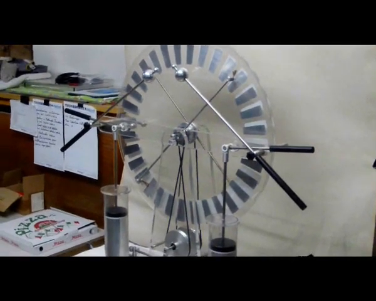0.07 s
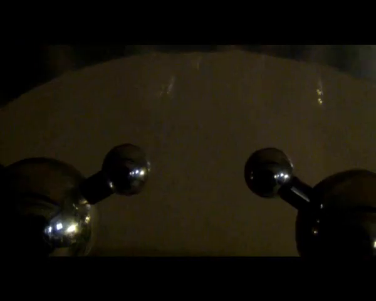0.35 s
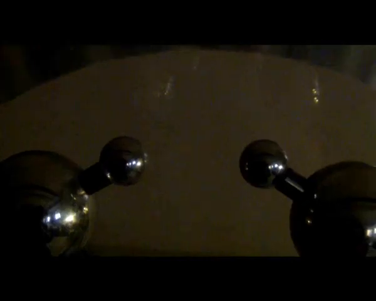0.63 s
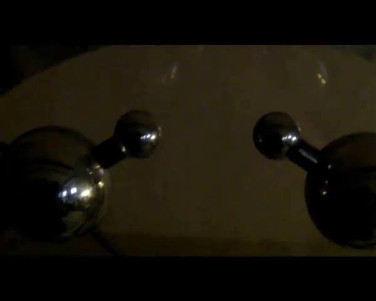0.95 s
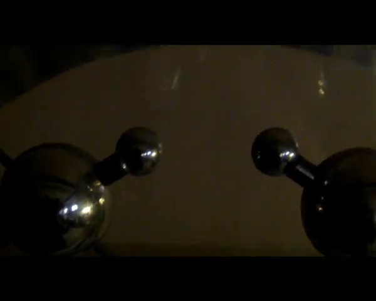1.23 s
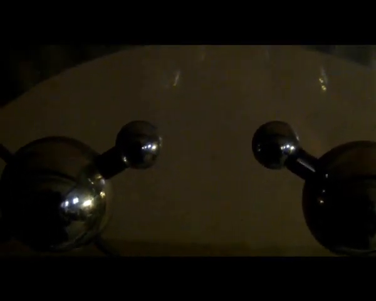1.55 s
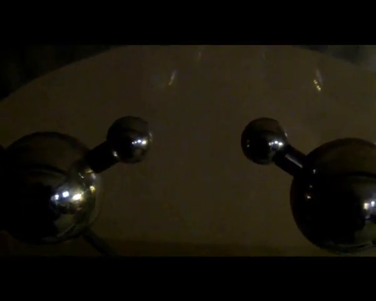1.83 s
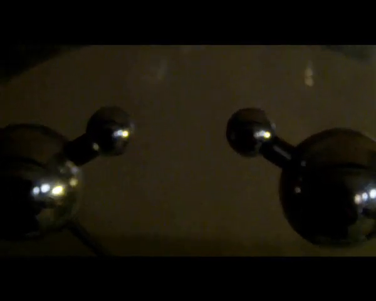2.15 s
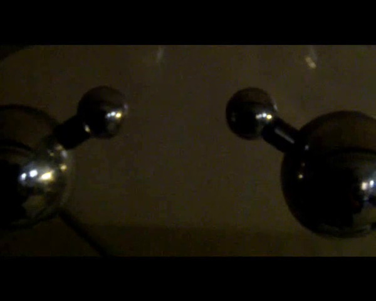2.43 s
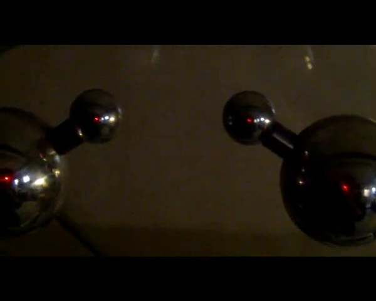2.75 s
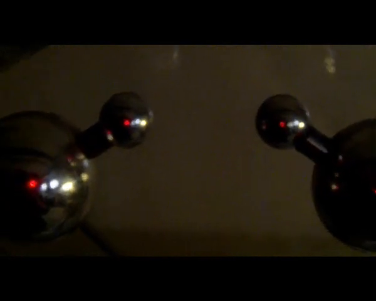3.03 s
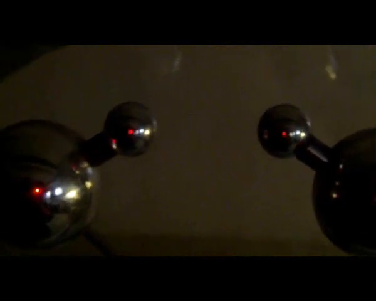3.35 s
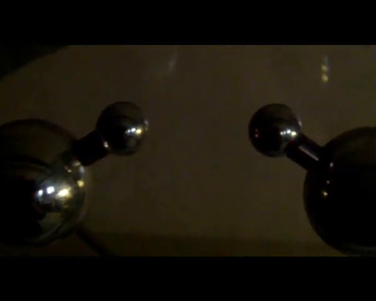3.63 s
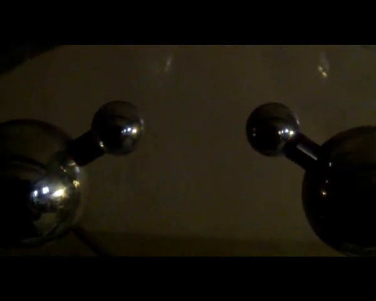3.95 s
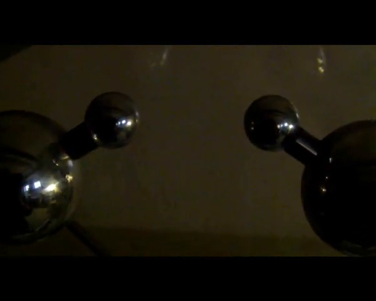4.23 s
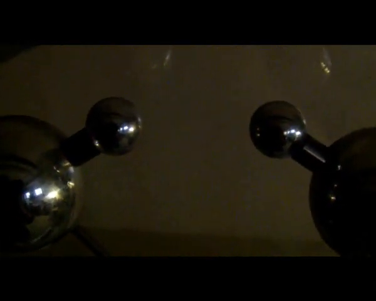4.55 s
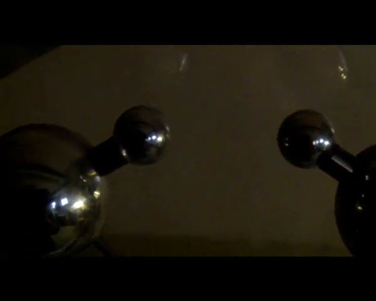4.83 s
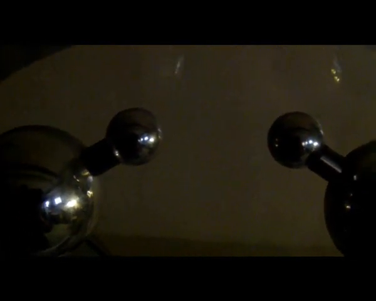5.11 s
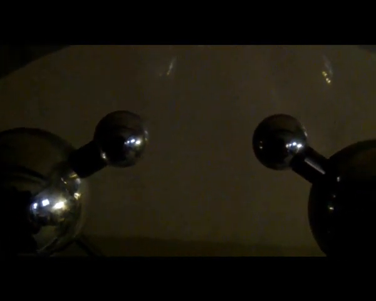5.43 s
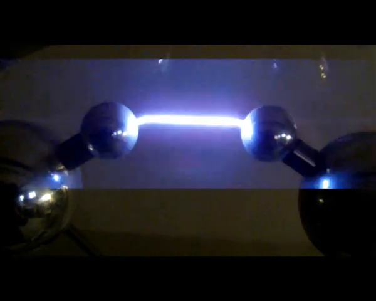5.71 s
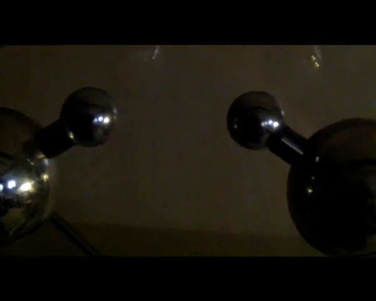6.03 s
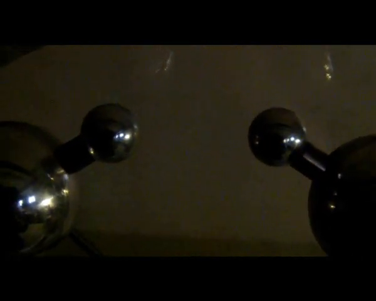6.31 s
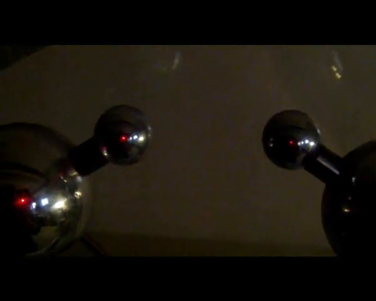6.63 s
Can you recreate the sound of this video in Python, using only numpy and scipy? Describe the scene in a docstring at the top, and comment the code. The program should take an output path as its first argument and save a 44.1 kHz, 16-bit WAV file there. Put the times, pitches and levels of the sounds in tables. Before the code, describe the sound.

After a moment of quiet room air, an electrostatic machine is suddenly running: small discharges tick irregularly at its brushes over a fine hiss and a low, wavering hum. Three loud sparks crack between metal balls, a couple of seconds apart. Each one overloads the close microphone for an instant, followed by a thump and the short ring of a small room. A faint metal ping comes between the second and third sparks.

```python
"""First comes a moment of quiet room air. Then an electrostatic machine is heard turning its discs:
small discharges tick at the brushes, charge hisses into the air (corona) and the drive hums low.
Three big sparks jump between the metal balls, and a small metal part pings once. Each big spark
jams the nearby camera's preamplifier for an instant; it then swings back with a thump into the
ring of the small room."""
import sys
import numpy as np
from scipy import signal
from scipy.fft import rfft, irfft, next_fast_len
from scipy.io import wavfile

SR = 44100
rng = np.random.default_rng(int(sys.argv[2]) if len(sys.argv) > 2 else 0)


def dump(signal):
    """Clip the signal to [-1, 1] and save it as 16-bit WAV at the path in sys.argv[1]."""
    limited = np.clip(np.atleast_2d(signal).T, -1, 1)
    pcm = np.round(limited * 32767).astype(np.int16)
    wavfile.write(sys.argv[1], SR, pcm)


N = 302967
START_S = 0.477  # the machine is heard from here on

# big sparks: (time [s], how long the preamplifier stays jammed [s], level of the room's ring [dB])
BIG_SPARKS = [(0.9966, 0.043, -15.5), (3.6053, 0.043, -15.5), (5.935, .0446, -15.5)]
# the loudest ticks at the brushes: (time [s], relative level [dB])
LOUD_TICKS = [(0.518, -19), (1.1868, -15), (1.2121, -22), (1.2304, -19), (1.2387, -16), (1.3173, -14.5),
              (1.4004, -16), (1.4566, -20.5), (1.6162, -21.5), (1.6422, -15.5), (1.6921, -21.5),
              (1.7406, -21), (1.8422, -18), (1.9616, -17.5), (2.0111, -17.5), (2.0403, -19), (2.0802, -16),
              (2.2242, -16.5), (2.2571, -18.5), (2.439, -20), (2.5374, -18.5), (2.605, -18.5),
              (2.6508, -17), (2.7476, -17.5), (2.8161, -16.5), (2.8454, -21), (2.9103, -16), (3.3762, -16),
              (3.7773, -15.5), (3.8643, -16), (3.8736, -19), (3.9312, -17), (4.0021, -16.5), (4.0171, -17),
              (4.134, -19), (4.1692, -19.5), (4.2562, -14), (4.3193, -15.5), (4.3809, -15), (4.5087, -16),
              (4.8199, -17.5), (4.8826, -16.5), (4.9267, -17.5), (5.6286, -17), (6.0736, -17.5),
              (6.1305, -14.5), (6.174, -17.5), (6.1874, -16.5), (6.2277, -20), (6.2639, -15.5),
              (6.322, -18), (6.3778, -17), (6.6258, -18.5), (6.6812, -18), (6.773, -19.5), (6.793, -17.5)]
# tone colours, or how strong each pitch is in a sound: (frequency [Hz], relative level [dB])
SPARK_COLOUR = [(100, -5.5), (500, -14), (1200, -12), (2500, -8), (4500, -3.5), (7000, -1), (9500, -2),
                (12000, -7.5), (15500, -15)]
BRUSH_COLOUR = [(200, -16.5), (700, -6.5), (1400, -7.5), (2400, -10), (3200, -5), (3900, 0), (4600, 1),
                (5700, -3), (7000, 0), (9500, -1.5), (11500, -8), (14500, -10.5), (16000, -13.5)]
CORONA_COLOUR = [(300, -14), (1000, 2), (2400, -1.5), (3200, 0.5), (4300, -2.5), (5700, 1), (7200, -0.5),
                 (9500, -2.5), (12000, -6), (15700, -19)]
RUMBLE_COLOUR = [(8, 6), (20, 9), (55, -2.5), (72, -5), (95, -32), (180, -22), (380, -18.5), (480, -33),
                 (800, -27), (1600, -40), (3000, -34), (8000, -84)]
AIR_COLOUR = [(10, 1), (40, 4), (90, -6), (150, -12), (300, -18), (430, -15), (550, -23.5), (1200, -25.5),
              (2000, -35), (5000, -42.5), (9000, -46), (16000, -56)]
# pitches at which the drive and its frame ring: (frequency [Hz], width [Hz], level [dB])
FRAME_RESONANCES = [(139, 6.8, -59), (189.5, 31, -60), (250, 24, -61.5), (299, 21, -61.5),
                    (340.2, 8.3, -61.5), (792, 41, -67), (1420, 125, -66)]
# how hard the drive works: (time [s], gain of rumble and hum [dB])
DRIVE_EFFORT = [(0.7, -2), (1.4, 2), (1.85, -1), (2.3, 2.5), (2.8, -3), (4.1, -1.5), (4.55, -1.5),
                (5.25, 0.5), (5.7, -3), (6.85, 2)]
# how long the room echoes: (frequency [Hz], time to fade by 60 dB [s])
ROOM_FADE = [(150, 0.38), (1000, 0.45), (4000, 0.39), (8000, 0.33), (15000, 0.29)]


def sparks(leader_db=-33, leader_s=0.0022):
    """A faint first spark (the leader) bridges the gap; the charged jars empty and the room rings."""
    out, crack = np.zeros(N), click(SPARK_COLOUR)
    for s, _, db in BIG_SPARKS:
        ring = signal.fftconvolve(room_echo(), crack)
        add(out, s - leader_s, amp(leader_db) * discharge())
        add(out, s, amp(db) * ring / np.std(ring[:441]))  # level set by the first 10 ms
    return out


def overload(x, release_s=0.0021, rebound=0.83, settle_s=0.082, leak_db=-50):
    """Each spark pins the preamplifier at -1, almost mute; it lets go, overshoots and settles."""
    t, out = np.arange(N) / SR, x
    pinned = amp(leak_db) * x - 1
    for s, jammed_s, _ in BIG_SPARKS:
        since_release = np.maximum(t - s - jammed_s, 0)
        held = np.exp(-since_release / release_s)
        thump = rebound * np.exp(-since_release / settle_s) - (1 + rebound) * held
        recovering = (1 - 0.5 * held) * out + thump
        out = np.where(t < s, out, np.where(since_release > 0, recovering, pinned))
    return out


def discharge(body_db=0, body_hz=2000, spread_s=0.00032, echo_fade_s=0.015, size=1024):
    """One tick: a cluster of tiny spark threads, then echoes off the discs and frame."""
    t = np.arange(size) / SR - 0.001
    threads = rfft(np.exp(-(t / spread_s) ** 2) * rng.standard_normal(size))
    snap = irfft(threads / np.abs(threads))  # smeared in time, yet even at all frequencies
    echo_db = -25 + rng.normal(0, 2) - 60 * np.abs(t) / echo_fade_s
    echoes = amp(echo_db) * (t > 0) * rng.laplace(size=size)
    # each tick leaps from another spot and so has its own colour
    colour = [(hz, db + rng.normal(0, 1) + body_db * (hz < body_hz)) for hz, db in BRUSH_COLOUR]
    tick = signal.fftconvolve(snap + echoes, click(colour))
    return tick / np.std(tick[:132])  # level set by the first 3 ms


def brushes(corona_db, loud_gain_db=-14, echo_db=-13.5, clear_s=0.018, middle_per_s=19, faint_per_s=85):
    """Charged foil strips pass the brushes: loud and middling ticks echo, faint ones fall between."""
    out = np.zeros(N)
    ticks = [(s + 0.0004, amp(db + loud_gain_db) * discharge()) for s, db in LOUD_TICKS]
    for s in uneven_times(middle_per_s):
        # a loud tick takes all the charge around its moment; lesser ones have less body
        if all(abs(s - loud_s) > clear_s for loud_s, _ in LOUD_TICKS):
            above_db = 13 - 3 * lull(s) + rng.normal(0, 0.9)
            ticks.append((s, amp(corona_db[int(s * SR)] + above_db) * discharge(body_db=-1)))
    for s, tick in ticks:
        add(out, s, tick)
        add(out, s, amp(echo_db) * signal.fftconvolve(tick, room_echo()))
    for s in uneven_times(faint_per_s):
        above_db = 2.5 + 5.5 * np.clip(rng.standard_normal(), -2, 1.5)
        add(out, s, amp(corona_db[int(s * SR)] + above_db) * discharge(body_db=-1))
    return out


def lull(t, before_s=1, fade_s=0.27):
    """How far the crackle eases: 0 while the jars fill freely, 1 when nearly full before a spark."""
    return sum(np.clip((t - s + before_s) / fade_s, 0, 1) * (t < s) for s, _, _ in BIG_SPARKS)


def corona(corona_db, hiss_gain_db=-3, crackle_gain_db=-8, spikes_per_s=500):
    """Charge leaks into the air as a hiss with fine crackle in it."""
    spikes = (rng.random(N) < spikes_per_s / SR) * rng.standard_normal(N)
    crackle = unit(signal.fftconvolve(spikes, click(BRUSH_COLOUR))[:N])
    return amp(corona_db) * (amp(hiss_gain_db) * noise(CORONA_COLOUR) + amp(crackle_gain_db) * crackle)


def drive(t, low_db=-40, hum_hz=48.07, hum_width_hz=6):
    """Belts and bearings rumble under a wavering hum and keep the frame ringing."""
    effort_db = np.interp(t, *np.transpose(DRIVE_EFFORT))
    rumble = noise(RUMBLE_COLOUR)
    hum = resonance(hum_hz, hum_width_hz)
    frame = sum(amp(db) * resonance(hz, width) for hz, width, db in FRAME_RESONANCES)
    return amp(low_db + effort_db) * (rumble + hum) + frame


def ping(t, at_s=4.843, pitch_hz=3520, gain_db=-35, attack_s=0.003, fade_s=0.05):
    """A small metal part rings once."""
    age = np.maximum(t - at_s, 0)
    loudness = amp(gain_db - 60 * age / fade_s) * (1 - np.exp(-age / attack_s))
    return loudness * np.sin(2 * np.pi * pitch_hz * age)


def room_echo(size=256):
    """A wash of echoes off the walls, energy 1; each frequency dies at its own speed."""
    hz, t, spectrum = signal.stft(rng.standard_normal(SR // 2), SR, nperseg=size)
    fade = amp(-60 * t / along(ROOM_FADE, hz)[:, None])
    tail = signal.istft(spectrum * fade, SR, nperseg=size)[1]
    return tail / np.linalg.norm(tail)


def room_air(level_db=-49):
    """The soft, deep, steady noise of the room."""
    return amp(level_db) * noise(AIR_COLOUR)


def amp(db):
    """Turn decibels into a gain."""
    return 10 ** (np.asarray(db) / 20)


def unit(x):
    """Scale to an average level (rms) of 1."""
    return x / np.sqrt(np.mean(x ** 2) + 1e-20)


def along(points, hz):
    """Read between (frequency, value) points on a log frequency axis."""
    frequencies, values = np.transpose(points)
    return np.interp(np.log(hz + 1), np.log(frequencies), values)


def filtered(x, response):
    """Scale each frequency in x by response(hz)."""
    size = next_fast_len(N + SR // 2)
    return irfft(rfft(x, size) * response(np.fft.rfftfreq(size, 1 / SR)), size)[:N]


def noise(colour):
    """Noise of level 1 with the given tone colour."""
    return unit(filtered(rng.standard_normal(N), lambda hz: amp(along(colour, hz))))


def resonance(centre_hz, width_hz):
    """A narrow band of noise, heard as a wavering tone."""
    band = lambda hz: 1 / (1 + ((hz - centre_hz) / width_hz) ** 2) ** 2
    return unit(filtered(rng.standard_normal(N), band))


def click(colour, size=512):
    """The shortest click with the given tone colour, energy 1."""
    cepstrum = irfft(np.log(amp(along(colour, np.fft.rfftfreq(size, 1 / SR)))))
    # folding the second half onto the first packs the energy at the start
    cepstrum[1:size // 2] *= 2
    cepstrum[size // 2 + 1:] = 0
    pulse = irfft(np.exp(rfft(cepstrum)))
    return pulse / np.linalg.norm(pulse)


def uneven_times(per_s, evenness=3):
    """Random moments while the machine runs."""
    times = START_S + np.cumsum(rng.gamma(evenness, 1 / (evenness * per_s), size=800))
    return times[times < (N - 1) / SR]


def add(track, s, sound):
    """Mix a sound into the track at s seconds."""
    part = track[max(round(s * SR), 0):][:len(sound)]
    part += sound[:len(part)]


def scene(corona_start_db=-50.5, rise_db_per_s=0.5, lull_db=-1.04):
    """Quiet room air, then the running machine and its sparks."""
    t = np.arange(N) / SR
    # the corona grows as the discs keep turning, and dips before each spark
    corona_db = corona_start_db + rise_db_per_s * (t - START_S) + lull_db * lull(t)
    running = np.clip((t - START_S) / 0.0016, 0, 1)
    machine = drive(t) + corona(corona_db) + brushes(corona_db) + ping(t)
    return room_air() + running * machine + sparks()


def record(dry, low_cut_hz=1.2, notch_hz=8000, notch_width_hz=750, edge_hz=7000, top_hz=15900):
    """The camera overloads, drains slow drift, cuts a narrow treble band, clips and drops the top."""
    low_cut = lambda hz: 1j * hz / (low_cut_hz + 1j * hz)  # a coupling capacitor
    notch = lambda hz: (notch_hz ** 2 - hz ** 2) / (notch_hz ** 2 - hz ** 2 + 1j * hz * notch_width_hz)
    swing = overload(np.zeros(N))
    # the preamplifier can only swing so fast, which rounds the edges
    rounded_swing = filtered(swing, lambda hz: 1 / (1 + 1j * hz / edge_hz))
    overloaded = overload(dry) - swing + rounded_swing
    clipped = np.clip(filtered(overloaded, lambda hz: low_cut(hz) * notch(hz)), -1, 1)
    return filtered(clipped, lambda hz: 1 / np.sqrt(1 + (hz / top_hz) ** 120))


dry = scene()
out = record(dry)
dump(out)
```